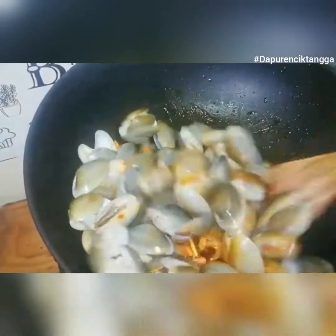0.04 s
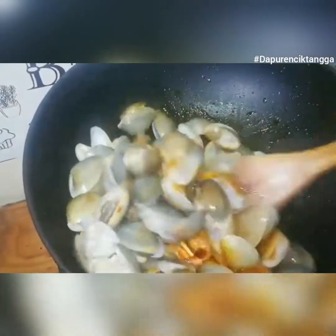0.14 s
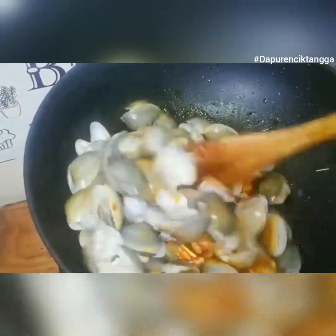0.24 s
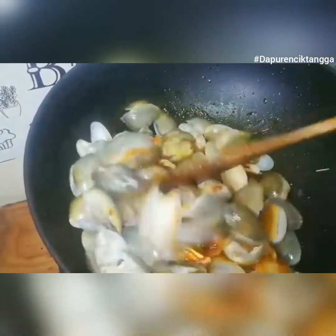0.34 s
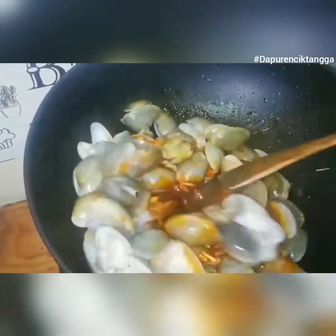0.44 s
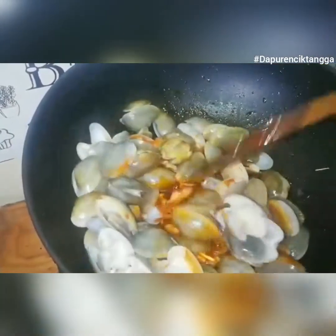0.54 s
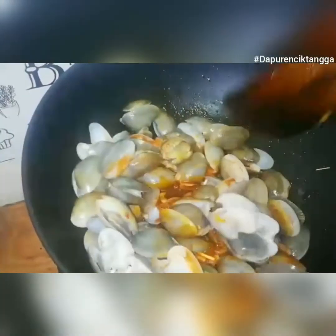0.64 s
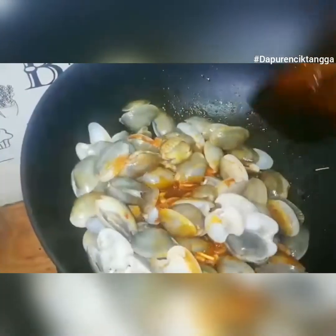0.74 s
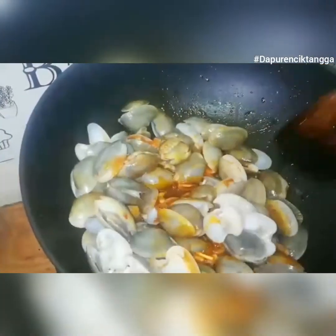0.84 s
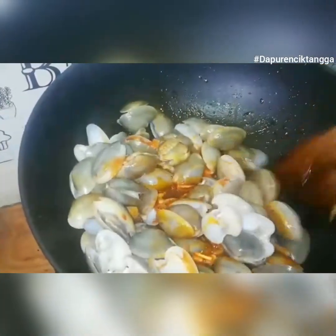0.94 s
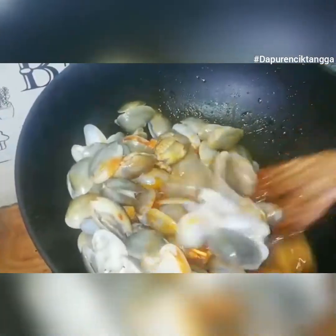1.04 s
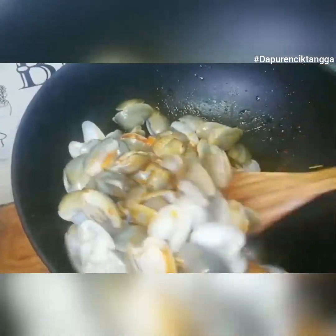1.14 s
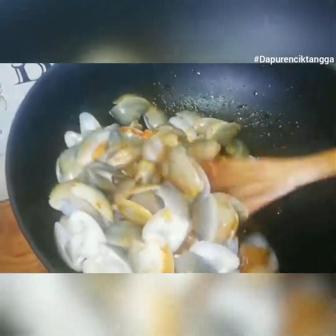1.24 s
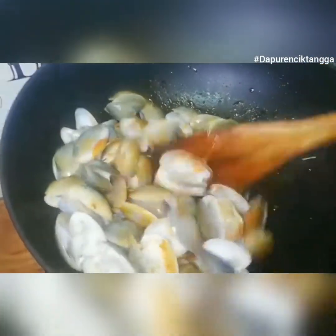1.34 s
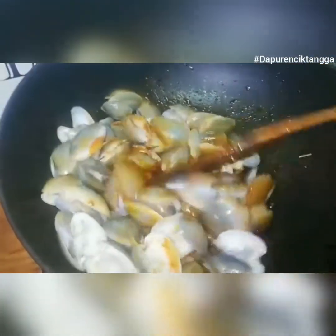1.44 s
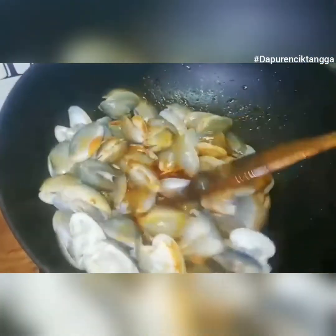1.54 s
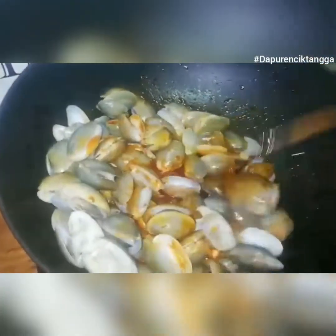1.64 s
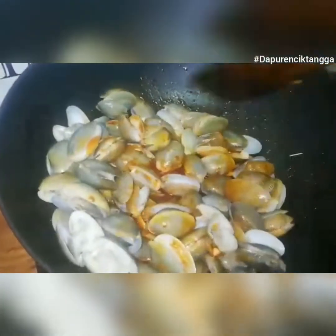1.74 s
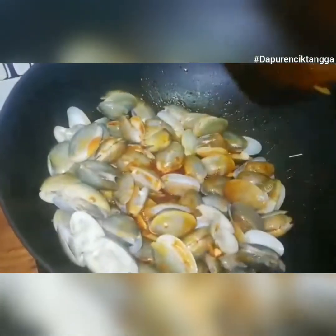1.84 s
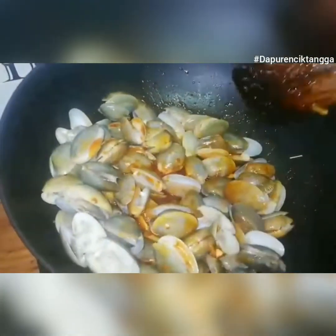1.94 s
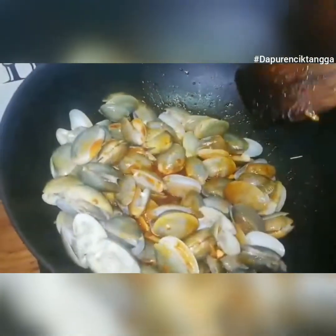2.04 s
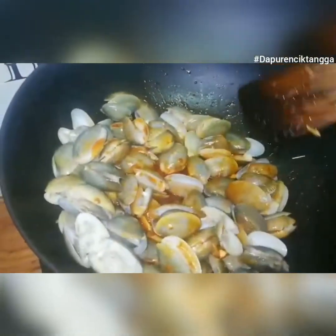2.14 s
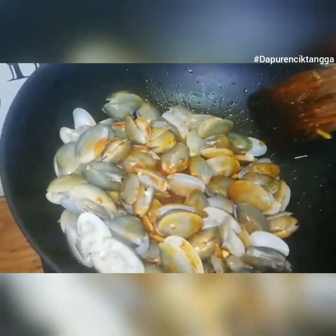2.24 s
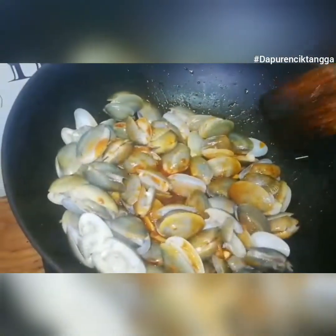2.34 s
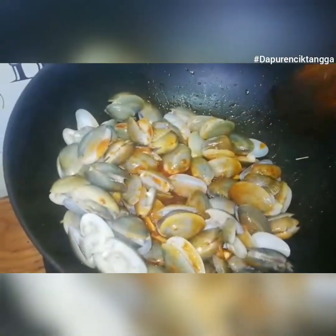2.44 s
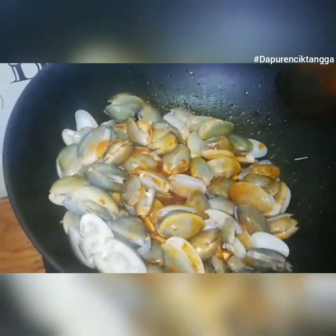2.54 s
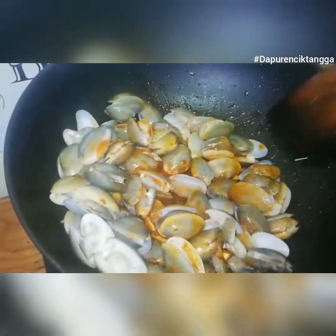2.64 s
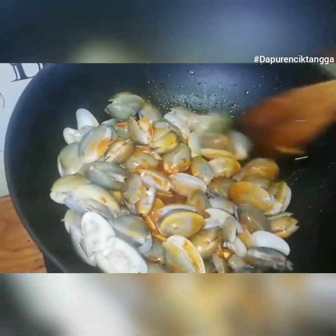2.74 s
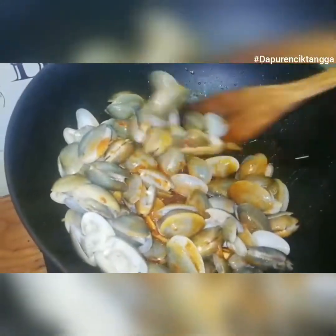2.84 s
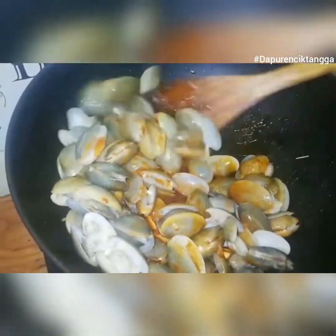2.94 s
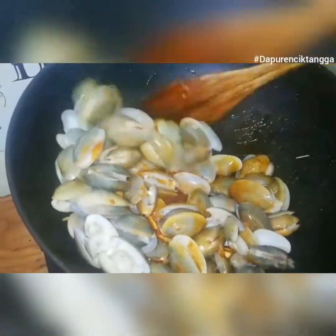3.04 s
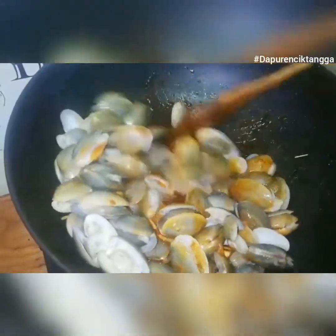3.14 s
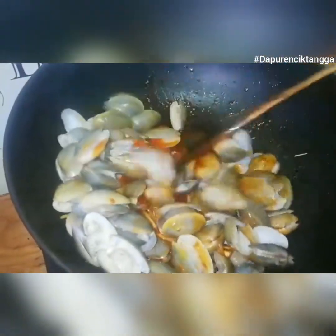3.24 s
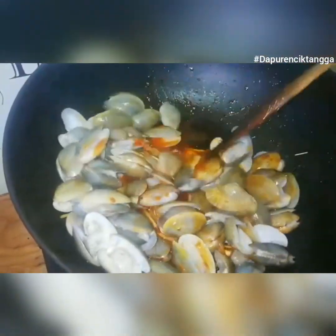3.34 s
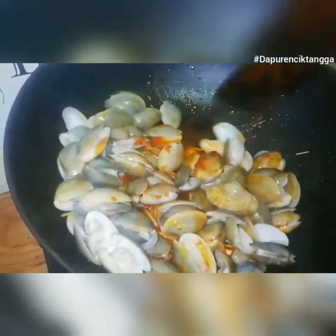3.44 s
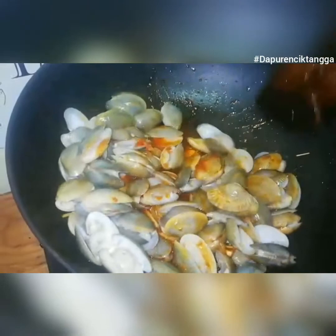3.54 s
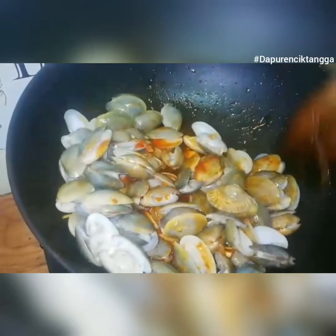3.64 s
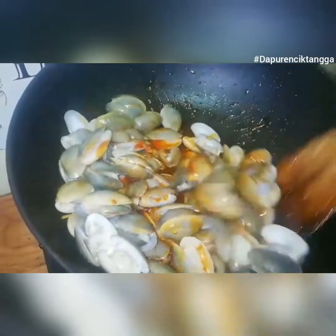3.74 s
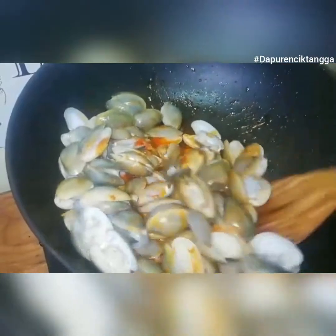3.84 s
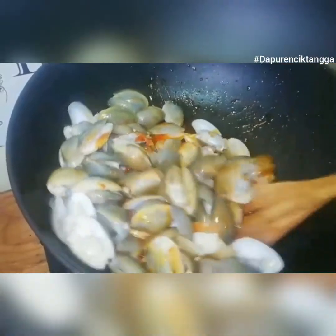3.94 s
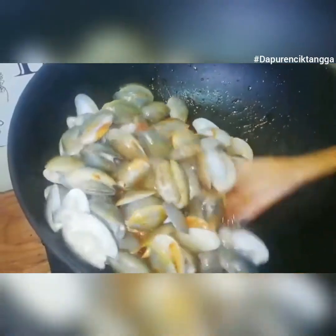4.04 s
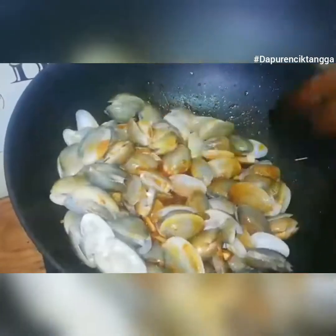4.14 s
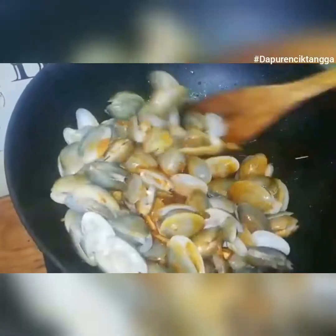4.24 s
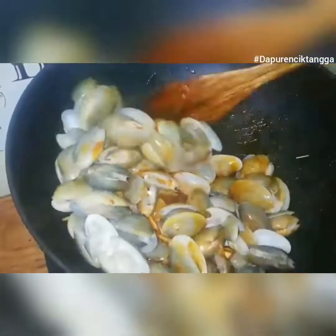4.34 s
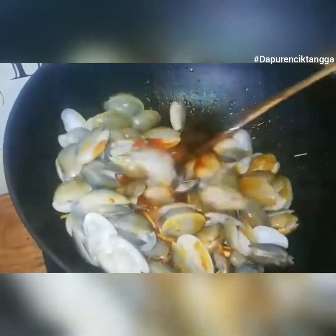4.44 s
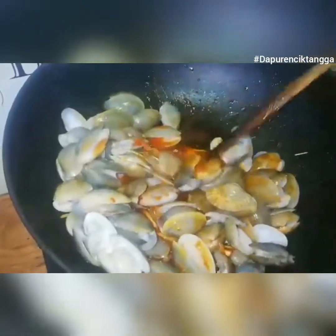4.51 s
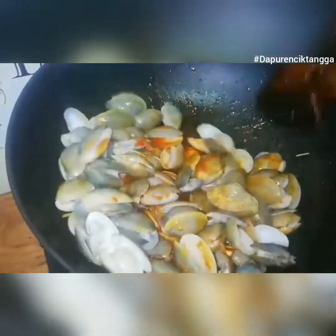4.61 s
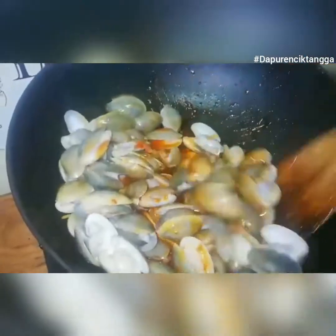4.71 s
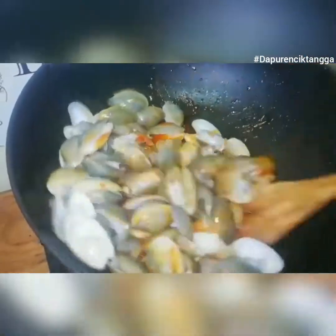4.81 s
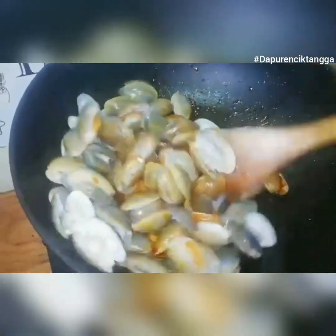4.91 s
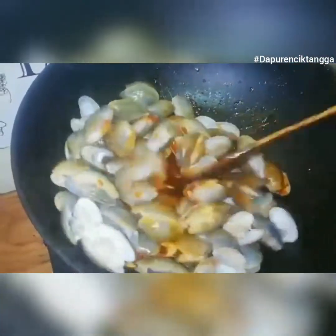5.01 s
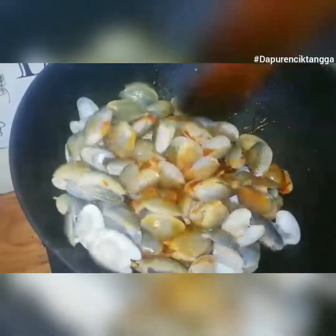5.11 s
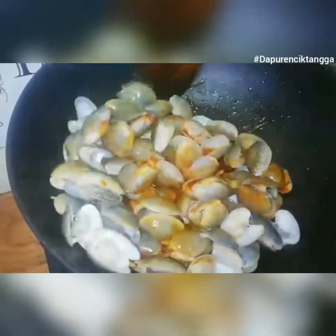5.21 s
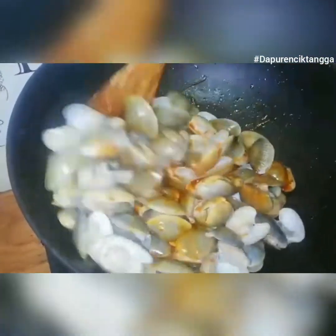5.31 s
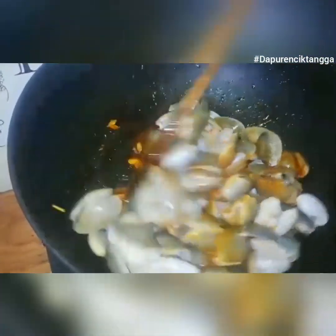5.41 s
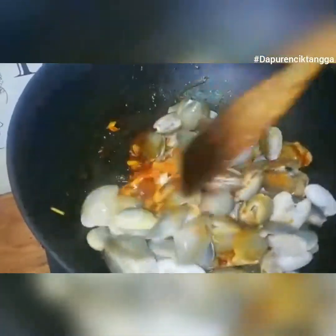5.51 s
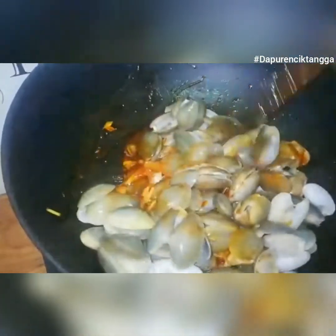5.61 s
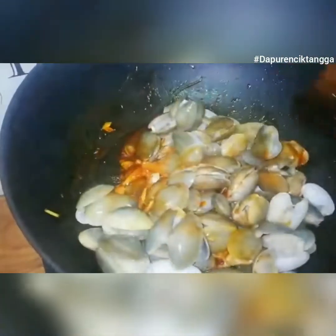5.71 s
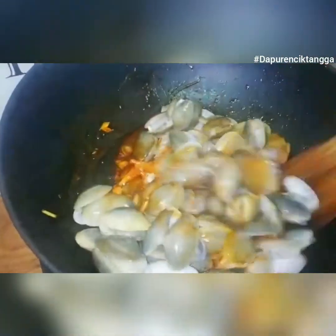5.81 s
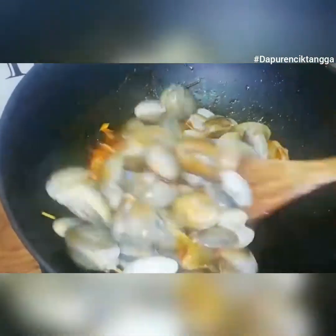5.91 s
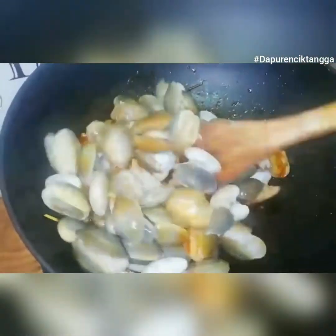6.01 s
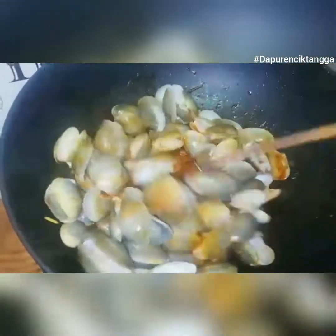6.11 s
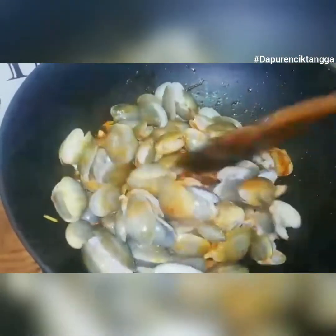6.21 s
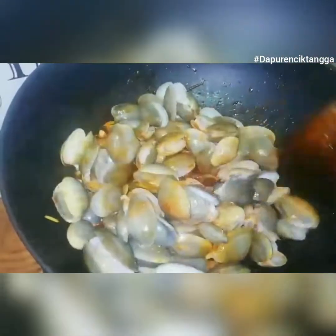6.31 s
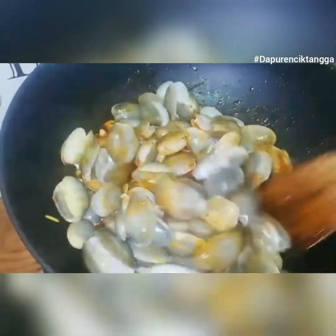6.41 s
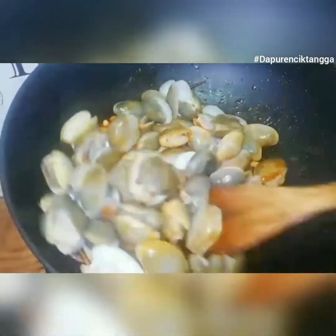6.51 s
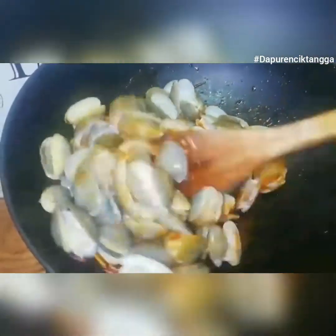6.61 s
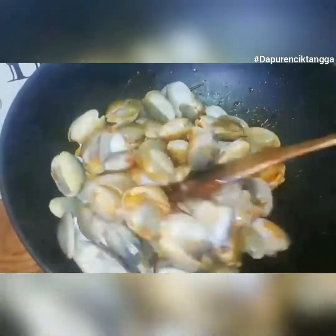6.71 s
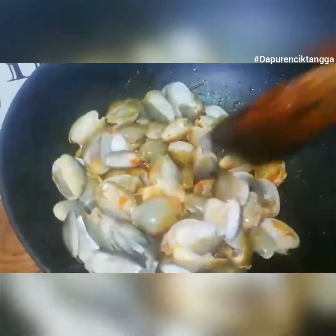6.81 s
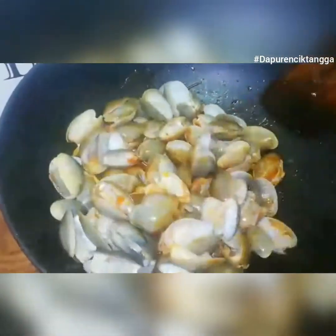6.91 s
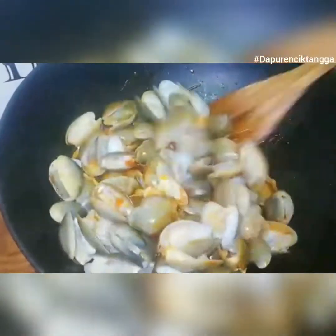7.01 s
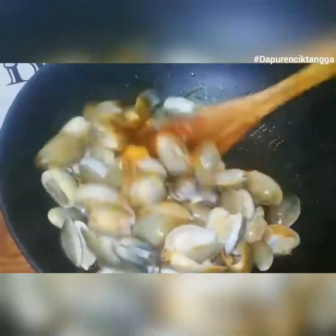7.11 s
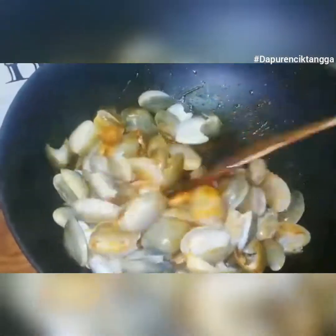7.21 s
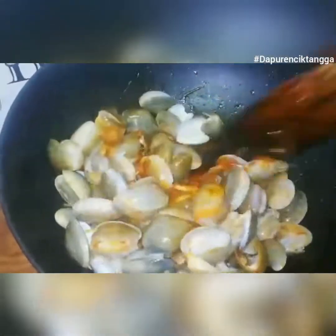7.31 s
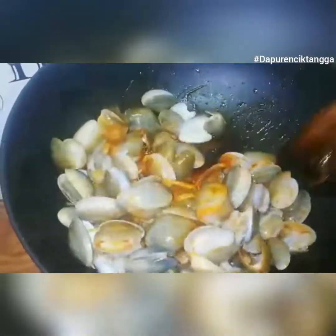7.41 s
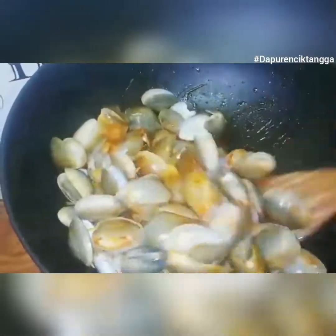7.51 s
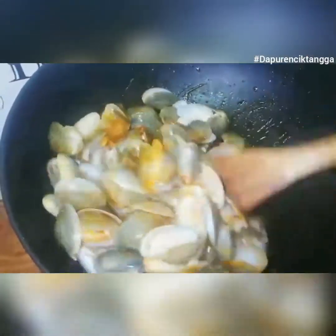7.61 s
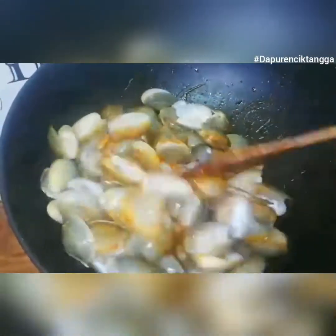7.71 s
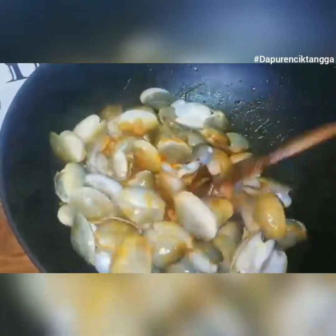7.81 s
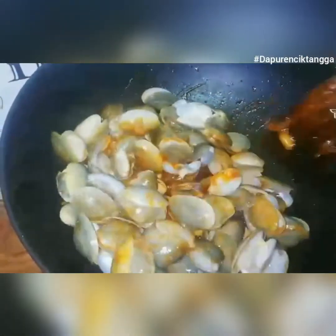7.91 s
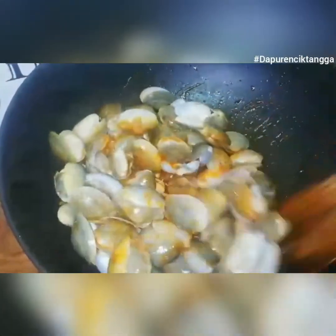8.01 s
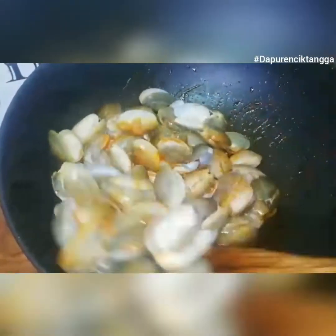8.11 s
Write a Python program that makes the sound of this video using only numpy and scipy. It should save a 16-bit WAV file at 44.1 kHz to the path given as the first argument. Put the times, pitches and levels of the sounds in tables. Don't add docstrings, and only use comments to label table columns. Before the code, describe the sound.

A wooden spatula stirs a heap of wet clam shells in a steel wok, very close in stereo. Each stroke begins with a woody knock and short metallic hum, then a dense bright rattle of ticks, clacks and hollow clonks with slight scraping. A pause near two seconds leaves faint ticks and a low air puff, then strokes return steadily. Small room echo and soft hiss.

```python
import sys
import numpy as np
from scipy import signal
from scipy.fft import rfft, irfft, next_fast_len
from scipy.io import wavfile
from scipy.ndimage import uniform_filter1d

SR = 44100
rng = np.random.default_rng(int(sys.argv[2]) if len(sys.argv) > 2 else 0)


def master_out(mix):
    frames = np.transpose(np.atleast_2d(mix))
    ceiling = np.clip(frames, -1, 1)
    pcm = np.round(ceiling * 32767).astype(np.int16)
    wavfile.write(sys.argv[1], SR, pcm)


def volts(x):
    e = np.asarray(x, float) / 20
    return 10 ** e


N = 359410

# t/s, knock peak/dB, knock f/Hz, hum level/dB, hum length/s
KNOCKS = [(0.35, -30, 1460, -51.5, 0.08), (0.893, -18, 1560, -33.5, 0.072), (2.563, -21.5, 1720, -42, 0.19),
          (2.878, -23, 1780, -40.5, 0.032), (3.606, -16.5, 1090, -35, 0.1), (4.154, -27, 730, -44.5, 0.089),
          (4.67, -20, 2000, -35, 0.036), (5.236, -24, 2370, -42, 0.013), (5.306, -16, 1483, -39.5, 0.017),
          (5.742, -19.5, 1670, -34.5, 0.015), (5.806, -32, 840, -42.5, 0.11),
          (6.969, -18.5, 2682, -35, 0.07), (7.44, -22, 2050, -35.5, 0.025),
          (7.744, -24.5, 1520, -57, 0.023), (8.015, -30, 2230, -59, 0.058)]
# f/Hz, level/dB, t60/s
HUM_MODES = [(216.5, -6.5, 0.4), (303.6, -0.5, 0.27), (388, -6.5, 0.074), (432.3, -6.5, 0.1)]
# f/Hz, density/dB per Hz
SHELL_COLOUR = [(290, -42), (500, -19.5), (710, -19), (798, -14.5), (1500, -2.5), (2390, -5.5),
                (3250, -1.5), (5920, -4), (9050, -0.5), (10500, -5), (15300, -20), (16500, -21)]


def evened(x):
    return x / np.sqrt(np.mean(x ** 2) + 1e-20)


def peaked(x):
    return x / (abs(x.mean(0)).max() + 1e-12)


def read(points, hz):
    f, value = np.transpose(points)
    return np.interp(np.log(hz + 1), np.log(f + 1), value)


def add(mix, start_s, sound):
    part = mix[:, round(start_s * SR):][:, :sound.shape[1]]
    part += sound[:, :part.shape[1]]


def coloured(x, points):
    size = next_fast_len(x.shape[-1])
    gain = volts(read(points, np.fft.rfftfreq(size, 1 / SR)))
    return irfft(rfft(x, size) * gain, size)[..., :x.shape[-1]]


def lumps(count, width):
    return evened(uniform_filter1d(rng.standard_normal(count), width))


def flat_bump(t, centre_s, half_s):
    return np.exp(-((t - centre_s) / half_s) ** 4)


def rings(hz, db, t60, rise_s, size):
    t = np.arange(size) / SR
    hz, db, t60 = (np.reshape(v, (-1, 1)) for v in (hz, db, t60))
    count = len(hz)
    shared_turn, own_turn = rng.random((count, 1)), rng.random((2, count, 1))
    face_db = rng.standard_normal((2, count, 1))
    apart = np.clip(0.14 + hz / 2800, 0, 1)
    decay = volts(db + 4.47 * apart * face_db - 60 * t / t60)
    modes = decay * np.sin(2 * np.pi * (hz * t + shared_turn + apart * own_turn))
    return modes.sum(1) * (1 - np.exp(-t / rise_s))


def choked_t60(hz, cycles):
    return cycles / np.sqrt(hz * 3000)


def shell(lo_hz, hi_hz, cycles, count):
    place, luck = rng.random((2, count))
    hz = lo_hz + (hi_hz - lo_hz) * place
    return rings(hz, -9 * luck, choked_t60(hz, cycles * (1.09 + 1.1 * luck)), 0.0001, size=400)


def tumble(x, rise_s, fall_s, share, blow=2.8):
    t = np.arange(500) / SR
    run = np.where(t < rise_s, (t / rise_s) ** 2, np.exp((rise_s - t) / fall_s))
    blows = run * rng.standard_normal(500) * (rng.random(500) < share)
    blows[round(rise_s * SR)] = blow
    return peaked(signal.fftconvolve(x, blows[None], axes=1))


def heap(lo_hz, hi_hz, cycles, count):
    return [tumble(shell(lo_hz, hi_hz, cycles, count=12), .0032, 0.0044, .09, blow=1.85) for _ in range(count)]


def strike(bodies, level_db, busy, per_s, spread_db):
    clump_db = np.clip(4 + 0.14 * (level_db - level_db.max() + 8), 1, 6)
    clump = volts(clump_db * lumps(N, 600))
    at = np.flatnonzero(rng.random(N) < per_s * busy * clump / SR)
    size = volts(spread_db * np.minimum(rng.exponential(1, N), 2.4)[at])
    size *= np.sqrt(SR / (per_s * busy[at]) / np.mean(size ** 2)) * volts(level_db[at])
    which = rng.integers(0, len(bodies), N)[at]
    out = np.zeros((2, N))
    for place, gain, k in zip(at, size, which):
        add(out, place / SR, gain / np.linalg.norm(bodies[k][0]) * bodies[k])
    return out


def rattle():
    level_db, hollow_db, drag_db = stirring()
    busy, steady = np.clip(volts(0.27 * (level_db + 27)), .3, 1.5), np.ones(N)
    hum_hz, hum_db, _ = np.transpose(HUM_MODES)
    bowl = []
    for _ in range(12):
        detuned_hz = hum_hz * rng.uniform(.95, 1.05, len(hum_hz))
        bowl.append(rings(detuned_hz, .3 * hum_db, .09, .004, size=2000))
    shells = heap(2030, 15870, 5.2, count=200)
    shuffle = strike(shells, level_db - 3.5, steady, 1500, 1.39)
    sharp = strike(shells, level_db + 14 * np.log10(busy), busy, 330, 1.03)
    hollow = strike(heap(473, 2430, 12.8, count=80), hollow_db - 1.5, steady, 400, 2.1)
    drag = strike(bowl, drag_db, steady, 70, 2.1)
    return volts(1.36) * coloured(shuffle + sharp, SHELL_COLOUR) + volts(4.0) * coloured(hollow, SHELL_COLOUR) + drag


def stirring():
    # t/s, length/s, rattle level/dB, settling/s per 20 dB, hollow part relative/dB
    strokes = [(0, 0.52, -31.5, 0.09, -5), (0.907, 0.0043, -41, -2.5, 3.5), (0.973, 0.73, -34.5, 0.21, -6),
               (2.563, 0.25, -51.5, .2, 4), (2.719, 0.035, -45, -1.6, 5), (2.757, .64, -38, 0.4, -5.5),
               (3.591, 0.013, -38.5, 0.2, 2.5), (3.73, .4, -28.5, -0.16, -5), (4.229, 0.35, -37, 0, -5.5),
               (4.663, 0.0042, -37, 0.14, -5), (4.73, 0.37, -35.5, 0.07, -3), (5.255, .02, -44, 0.7, -10),
               (5.275, 0.38, -36, -0.02, -6), (5.755, .01, -51.5, 0.3, -8), (5.817, 0.91, -35, 0.22, -3),
               (6.968, .005, -37, 0.7, -3), (7.019, 0.21, -29, 0.11, -8), (7.46, 0.019, -49, 0.9, 11),
               (7.498, 0.4, -35.5, 0.02, -4.5), (8.032, 0.19, -31.5, .1, -4.5)]
    # t/s, extra level/dB, build-up/s, dying/s
    spills = [(0, 10, .1, 0.21), (0.42, 10.5, 0.22, 0.071), (.632, 23, 0.017, 0.18),
              (1.088, 9.5, 0.2, 0.19), (1.18, 4.5, .06, 0.047), (1.427, 12, 0.16, 0.15),
              (1.611, 10.5, 0.081, 0.077), (1.738, 12.5, 0.017, 0.08), (1.8, 6, 0.05, 0.11),
              (2.799, 14, 0.075, 0.16), (2.942, 15, 0.12, 0.066), (3.214, 17, 0.2, 0.19),
              (4.302, 16, 0.082, 0.1), (4.48, 11.5, 0.089, 0.086), (4.646, 14, .004, 0.0057),
              (4.76, 7.5, 0.061, 0.089), (4.848, 8.5, 0.082, 0.02), (5.039, 12, 0.19, 0.031),
              (5.135, 9, 0.029, 0.023), (5.31, 11, 0.065, 0.054), (5.363, 7, 0.081, 0.48),
              (5.853, 15.5, 0.016, 0.098), (6.111, 10.5, 0.032, 0.091), (6.331, -11, 0.063, 0.024),
              (6.445, 12.5, 0.071, 0.085), (6.68, 7, 0.13, 0.034), (7.099, 4, 0.15, 0.35),
              (7.535, 12.5, 0.06, 0.15), (7.775, 6.5, 0.12, 0.074), (8.057, 6.5, 0.036, 0.064)]
    # t/s, extra drag/dB, half length/s
    leans = [
        (0.387, 7, 0.033),
        (1.84, -3, 0.099),
        (5.01, 2, 0.2),
        (5.547, -9, 0.26),
        (6.54, 10, 0.057),
        (8.01, 13.5, 0.033),
    ]
    attack_s = 0.016
    rest_db, rest_hollow_db = -59.5, -63
    hollow_share = 0.79
    hollow_fade_db, hollow_settle = -2.5, 0.82
    drag_db, drag_share = -58, 0.49
    scrape_db, scrape_s = -14.5, .12

    t = np.arange(0, N, 32) / SR
    spill_db = 0
    for s, db, rise_s, fall_s in spills:
        spill_db = spill_db + db * np.clip(np.minimum(1 + (t - s) / rise_s, 1 - (t - s) / fall_s), 0, 1)
    level, hollow = volts(rest_db) ** 2, volts(rest_hollow_db) ** 2
    for s, length_s, db, settle_s, hollow_db in strokes:
        rise_db = -20 * np.maximum((s - t) / attack_s, 0)
        fall_db = -20 * np.maximum((t - s - length_s) / max(settle_s, .01), 0)
        dig_db = hollow_db + hollow_fade_db * (np.clip((t - s) / length_s, 0, 1) - .5)
        level = level + volts(db + rise_db + fall_db + spill_db) ** 2
        hollow_fall_db = fall_db / hollow_settle
        hollow = hollow + volts(db + rise_db + hollow_fall_db + dig_db + hollow_share * spill_db) ** 2
    level_db = 10 * np.log10(level)
    lean_db = sum(db * flat_bump(t, s, half_s) for s, db, half_s in leans)
    drag = volts(drag_db + lean_db + drag_share * (level_db + 29.0)) ** 2
    for s, _, _, hum_db, length_s in KNOCKS:
        fall_db = -20 * np.maximum((t - s - length_s) / scrape_s, 0)
        drag = drag + (t > s) * volts(hum_db + scrape_db + fall_db) ** 2
    return [np.interp(np.arange(N) / SR, t, 10 * np.log10(power)) for power in (level, hollow, drag)]


def clacks():
    # t/s, peak/dB, strongest ring f/Hz
    edge_ticks = [(.1462, -3, 10200), (.494, -7.5, 10700), (.5756, -8, 8500), (1.0042, -12, 8840),
                  (1.0166, -1, 10450), (1.0265, -6.5, 10400), (1.116, -4.5, 9870), (1.253, -7.5, 9800),
                  (1.59, -8, 9800), (1.6788, -9, 7360), (2.9497, -4.5, 8640), (2.984, -2, 9000),
                  (3.3048, -10, 10440), (3.7983, -5.5, 9200), (3.8623, -2, 8830), (3.993, -12, 9400),
                  (4.0446, -8, 8800), (4.424, -11.5, 10000), (4.792, -5.5, 8650), (4.8895, -7.5, 8800),
                  (5.051, -15, 8900), (5.9582, -6, 9300), (6.0307, -10, 8000), (6.073, -2, 7900),
                  (6.3044, -8.5, 8400), (6.79, -16, 7800), (7.185, -4, 9700), (7.835, -18, 7000),
                  (7.907, -21, 8300), (8.0415, -21, 9600)]
    # t/s, peak/dB, strongest ring f/Hz
    back_clacks = [(.1094, -3.5, 4550), (.2389, -9.5, 4600), (.2809, -8.5, 5040), (1.055, 0, 5460),
                   (1.6603, -12.5, 3500), (1.721, 0, 6520), (2.8218, -4, 6630), (2.9006, -9, 3280),
                   (3.035, -12, 5650), (3.3462, -13.5, 3760), (3.4313, -13, 2670), (3.495, -20.5, 6650),
                   (3.594, -16, 7100), (3.93, -10, 4100), (4.1372, -8.5, 3130), (4.4622, -8.5, 6700),
                   (4.581, -13, 2390), (4.6132, -22, 6460), (4.866, -12.5, 6580), (4.933, -13, 3000),
                   (5.4655, -17, 3420), (5.671, -11, 4850), (5.8352, -6.5, 6700), (6.468, -7.5, 3010),
                   (6.7438, -7.5, 4300), (6.839, -13, 3040), (7.2796, -11, 4700), (7.4874, -12, 6030),
                   (7.86, -13.5, 6000), (8.0637, -8, 3160), (.6245, -21, 3435), (3.5495, -25, 5560),
                   (5.137, -23, 7500), (6.217, -22.5, 8500), (6.735, -20, 2780), (.3135, -6.5, 7600),
                   (3.3525, -14, 7100), (4.646, -22.5, 7000)]
    # t/s, peak/dB, strongest ring f/Hz
    cup_clonks = [(.0538, -3.5, 4690), (.3581, -4.5, 5200), (.4199, -11.5, 3560), (.9738, -8, 7270),
                  (1.322, -14.5, 6750), (1.5135, -7.5, 3560), (2.5648, -27, 2540), (2.764, -17, 3550),
                  (2.798, -7, 10400), (3.1096, -12, 10000), (3.1951, -8.5, 4770), (3.7224, -12.5, 2280),
                  (4.2527, -15.5, 8600), (4.2744, -11, 7100), (4.4504, -8, 7800), (4.7237, -15.5, 2240),
                  (5.235, -22.5, 3030), (5.297, -15.5, 9200), (5.3083, -10, 8300), (5.8939, -3, 3320),
                  (6.0975, -9.5, 5900), (6.4326, -14, 9200), (6.6493, -12.5, 8600), (6.6705, -16.5, 5260),
                  (6.9688, -12.5, 2650), (7.0231, -8.5, 5500), (7.0692, -13.5, 6040), (7.6932, -17, 8950),
                  (7.7667, -12.5, 8600), (3.5725, -24.5, 2850), (5.1185, -17, 1670), (6.339, -16.5, 3250)]
    out = np.zeros((2, N))
    for rows, hollow_db in (edge_ticks, -23), (back_clacks, -32.5), (cup_clonks, -10):
        for s, db, hz in rows:
            lead_hz = hz * np.array([.9, 1, 1.12])
            lead = rings(lead_hz, [-3, 0, -3], 12 / np.sqrt(hz * 3000), 0.00072, size=400)
            near = shell(0.698 * hz, 1.316 * hz, 6.2, count=10)
            crack = coloured(shell(max(2130, 0.543 * hz), 14480, 20.6, count=40), SHELL_COLOUR)
            body = 0.69 * peaked(lead) + 0.32 * peaked(near) + 0.98 * peaked(crack)
            bright = tumble(body, 0.0034, 0.0019, 0.22, blow=1.73)
            hollow = tumble(shell(1013, 2370, 20.4, count=6), 0.0021, 0.0023, 0.066)
            add(out, s - .0018, volts(db - 3.5) * (bright + volts(hollow_db) * hollow))
    return out


def spatula():
    # f/Hz, level/dB, t60/s
    wok_modes = [(553.5, -10, 0.18), (765.5, -6, 0.16), (992, -10, 0.19), (1203, -8, 0.24),
                 (1512, -1, 0.089), (1920, -10.5, 0.15), (2130, -3.5, 0.15), (2650, -4, 0.1)]
    sag_share, sag_s = 0.29, 0.012
    wood_ratios = np.array([.45, .6, .8, 1, 1.3, 1.7, 2.3, 3.7])
    wood_db = [-2.0, 0, -5.0, 10.5, -2.0, -2, -7.0, -23.0]

    size = 9000
    out, t = np.zeros((2, N)), np.arange(size) / SR
    wok_hz, wok_db, wok_t60 = np.transpose(wok_modes)
    rock_hz, _, rock_t60 = HUM_MODES[0]
    for s, db, hz, hum_db, length_s in KNOCKS:
        damp = 1 / (1 + np.exp((t - length_s) / 0.0053)) + 0.019
        wood = rings(hz * wood_ratios, wood_db, 0.011, 0.00067, size=900)
        spot_db = 0.9 * rng.standard_normal(len(wok_hz))
        steel = peaked(rings(wok_hz, wok_db + spot_db, wok_t60, 0.0029, size=size))
        thump = sum(rings(*mode, 0.0035, size=size) for mode in HUM_MODES[1:])
        turns = np.cumsum(rock_hz * (1 + sag_share * np.exp(-t / sag_s))) / SR
        swell = np.sin(2 * np.pi * turns + [[0], [.35]])
        swell *= volts(-60 * t / rock_t60) * (1 - np.exp(-(t / 0.015) ** 2))
        swell *= volts(3 * lumps(size, 700))
        crack = peaked(shell(486, 6130, 74, count=40))
        jump = np.pad(tumble(crack, .001, .004, .1), ((0, 0), (0, 500)))
        add(out, s, volts(db - 4.5) * tumble(wood, 0.00096, 0.0045, .08) + volts(db - 9) * jump)
        steel_gain = volts(db - 14.0 + 6.5 * lumps(size, 150))
        hum = volts(hum_db + 5.0) * peaked(thump + 1.5 * swell)
        add(out, s, (steel_gain * steel + hum) * damp)
    return out


def contacts():
    # t/s, peak/dB, ring f/Hz
    cups = [(0.1218, -19.5, 1660), (0.3989, -22, 1090), (0.4762, -20, 2390), (0.485, -25, 3220),
            (1.0313, -16, 1910), (1.1186, -17, 3500), (1.1707, -38, 3440), (1.1971, -25, 3300),
            (1.2163, -23, 3680), (1.2737, -21, 3120), (1.4776, -21.5, 1436), (.0165, -19.5, 1630),
            (1.6905, -18, 2280), (1.7859, -33.5, 3320), (2.7664, -24, 1850), (2.8043, -18, 3970),
            (2.8261, -18, 3270), (3.1685, -21.5, 2130), (3.2635, -26, 1800), (3.2794, -25, 1700),
            (5.3085, -25.5, 1365), (3.8628, -20.0, 3440), (3.895, -22.5, 3180), (3.9188, -19, 3300),
            (3.9442, -27, 3600), (3.9676, -28, 1890), (3.9778, -23, 3950), (5.2375, -27, 2550),
            (4.2757, -22, 3470), (4.3424, -26, 2190), (4.4531, -21, 2140), (4.4902, -22, 2060),
            (4.5397, -23.5, 3550), (7.6935, -29, 1310), (4.737, -29, 1980), (4.7478, -22, 3480),
            (4.8288, -22.5, 1700), (4.9145, -22, 1860), (5.1975, -47, 1590), (5.615, -28, 1680),
            (5.6345, -34, 3300), (5.6989, -33.5, 1730), (5.8338, -25.5, 2350), (5.9637, -22.5, 3100),
            (6.0116, -24, 3050), (6.1005, -19.5, 1560), (6.2424, -33.5, 1700), (5.2385, -31.5, 1400),
            (6.4238, -24, 3780), (6.4342, -28, 1790), (6.5628, -27.5, 1750), (6.5766, -28, 2990),
            (6.6077, -25.5, 3700), (7.0494, -19.9, 4080), (7.1184, -21.5, 3400), (7.5238, -26, 1680),
            (7.6429, -31, 2520), (7.7454, -21, 1500), (8.0837, -17, 3320)]
    # t/s, peak/dB, ring f/Hz
    rims = [(0.1274, -13.5, 4860), (0.1902, -31, 8100), (0.2553, -22, 4550), (0.2628, -13.5, 8570),
            (0.3846, -20, 8110), (0.4209, -18.5, 7500), (0.4279, -16, 7660), (1.1027, -17, 8740),
            (1.1649, -20, 7590), (1.2025, -18, 6370), (1.3898, -20.5, 9450), (1.4093, -17, 8500),
            (1.4508, -12, 8460), (1.5531, -20.5, 6100), (1.6247, -20.5, 6160), (1.6311, -24, 10200),
            (2.8354, -20.5, 6860), (2.9032, -23, 9470), (2.966, -10, 8960), (3.0512, -20, 5460),
            (3.0776, -19, 6790), (3.7417, -18, 4410), (.0298, -19, 6370), (4.0766, -22, 8960),
            (4.1073, -20, 7760), (4.285, -18, 7280), (4.351, -12, 10340), (4.3717, -19.5, 4880),
            (4.4118, -28, 4830), (4.476, -15.8, 8760), (4.5274, -15.5, 9090), (4.9363, -20, 8600),
            (5.0313, -17, 7950), (5.0583, -17, 8710), (5.276, -22, 5980), (5.3902, -18, 8200),
            (5.4764, -23, 8800), (5.5549, -19.5, 7200), (6.0456, -14.5, 7990), (6.1345, -23, 10230),
            (6.1755, -16.5, 8040), (6.2719, -19, 5660), (6.2998, -30.5, 11550), (6.4868, -19, 9240),
            (6.5834, -24.5, 9380), (6.6311, -24, 6580), (7.7915, -21, 8660), (6.7351, -24.5, 8890),
            (6.9703, -18.5, 9040), (7.0345, -22, 5130), (7.0723, -17, 5920), (7.0896, -17, 9300),
            (7.1576, -17, 9980), (7.2642, -21, 8560), (7.2905, -19, 8780), (7.6057, -19, 8490),
            (7.7245, -26, 9780), (8.1375, -20, 8980), (8.0635, -12.5, 8900)]
    # t/s, peak/dB, ring f/Hz, t60/s
    grunts = [(0.016, -28, 987, 0.065), (.325, -38, 890, 0.11), (.352, -37, 396, 0.34),
              (0.391, -38, 1050, .07), (.41, -39, 435, 0.15), (4.676, -36, 2650, .1),
              (5.2355, -20.5, 2557, 0.023), (2.8, -33, 960, 0.034), (2.98, -36.5, 856, 0.033),
              (4.086, -39.5, 390, 0.15), (5.2355, -26.5, 1430, 0.016), (4.99, -40, 377, .1),
              (6.484, -38, 935, .05), (6.558, -39.5, 775, 0.07), (3.614, -33.5, 2680, .2),
              (3.616, -34, 2150, .2), (5.3095, -23, 1350, 0.027)]
    out = np.zeros((2, N))
    for rows, cycles in (cups, 21), (rims, 12):
        for s, db, hz in rows:
            lead_hz = hz * np.array([.92, 1, 1.09])
            lead = rings(lead_hz, [-7, 0, -7], cycles / np.sqrt(hz * 3000), 0.00083, size=600)
            near = shell(max(1050, 0.562 * hz), 1.715 * hz, 1.24 * cycles, count=12)
            body = peaked(lead) + .45 * np.pad(peaked(near), ((0, 0), (0, 200)))
            add(out, s - .0036, volts(db + 2.5) * tumble(body, 0.0025, 0.0019, .09, blow=2.2))
    for s, db, hz, t60 in grunts:
        grunt = rings(hz * np.array([.93, 1, 1.1]), [-8, 0, -8], t60, 3.1 / hz, size=7000)
        add(out, s, volts(db) * peaked(grunt))
    return out


def settling():
    # t/s, peak/dB, ring f/Hz
    settling_ticks = [
        (1.9127, -40, 3420),
        (2.0978, -41, 2020),
        (2.159, -41, 1344),
        (2.339, -43, 1920),
        (2.3544, -40, 2030),
        (2.431, -43, 1910),
        (2.543, -35.5, 1840),
        (2.727, -26.5, 1230),
        (2.673, -37, 1950),
    ]
    out = np.zeros((2, N))
    for s, db, hz in settling_ticks:
        tick = rings(hz * np.array([.6, 1, 1.12, 1.5]), [-10, 2.5, -8, -11], 0.01, 0.001, size=900)
        add(out, s, volts(db - 4.5) * peaked(tick))
    return out


def echo(x):
    # f/Hz, t60/s
    tail_t60 = [(300, 0.34), (1500, 0.2), (5000, 0.16), (10000, 0.1), (15000, 0.071)]
    taps = np.zeros((2, SR // 2))
    grid = np.arange(60, SR // 2 - 20, 20)
    at = grid + rng.integers(0, 20, (2, len(grid)))
    np.put_along_axis(taps, at, rng.choice([-1., 1.], at.shape), 1)
    hz, t, z = signal.stft(taps, SR, nperseg=256)
    tail = signal.istft(z * volts(-60 * t / read(tail_t60, hz)[:, None]), SR, nperseg=256)[1]
    return signal.oaconvolve(x, tail / np.linalg.norm(tail[0]), axes=1)[:, :N]


def kitchen():
    # f/Hz, density/dB per Hz
    hiss_colour = [(88, -47), (150, -5.5), (356, -6.5), (378, -6), (518, -19), (571, -18), (798, -16),
                   (916, -16.5), (7810, -27.5), (15200, -36), (16500, -43)]
    a, b = rng.standard_normal((2, N))
    shared = coloured(a, [(150, 6.5), (500, -18.0), (1200, -8)])
    own = coloured(b, [(150, -23.0), (500, 3.5), (1200, 3.5)])
    other = coloured(b[::-1], [(150, -20.0), (500, 5.0), (1200, 4.0)])
    hiss = evened(coloured(np.array([shared + own, shared + other]), hiss_colour))
    whistle = signal.lfilter(*signal.iirpeak(5480, 90, SR), a)
    return volts(-55.5) * (hiss + volts(-23) * evened(whistle))


def air():
    # f/Hz, density/dB per Hz
    air_colour = [(9, -31.5), (20, 1.5), (40, -10), (63, -1), (85, -4), (140, -10.5), (200, -38),
                  (400, -84)]
    # t/s, extra level/dB, half length/s
    puffs = [
        (.95, 7, 0.079),
        (2.216, 20.5, 0.073),
        (2.363, 10, 0.04),
        (6.8, 2, 0.6),
    ]
    a, b = rng.standard_normal((2, N))
    rumble = evened(coloured(np.array([a + 0.037 * b, a - 0.0343 * b]), air_colour))
    t = np.arange(N) / SR
    puff_db = sum(db * flat_bump(t, s, half_s) for s, db, half_s in puffs)
    swell_db = evened(uniform_filter1d(b, 6000))
    return volts(-57.5 + puff_db + swell_db) * rumble


def scene():
    duck_from_db, duck_share, recover_db_per_s = -45, 0.18, 45
    wok = rattle() + clacks() + spatula() + settling() + contacts()
    power_db = 10 * np.log10(abs(uniform_filter1d((wok ** 2).mean(0), size=2000)) + 1e-12)
    fall_db = np.arange(N) * recover_db_per_s / SR
    held_db = np.maximum.accumulate(power_db + fall_db) - fall_db
    over_db = np.maximum(held_db - duck_from_db, 0)
    return wok + volts(-10.0) * echo(wok) + kitchen() * volts(-duck_share * over_db) + air()


def low_pass(x):
    return signal.sosfilt(signal.butter(12, 16630, fs=SR, output="sos"), x)


def record(dry):
    # t/s, level/dB
    dropouts = [
        (0.159, -2),
        (4.15, -29),
        (4.438, -9),
    ]
    dry = np.clip(dry, -.72, .72)
    left = coloured(dry[0], [(5000, 0.0), (9000, 0.5), (14000, -4.5), (15700, 9.0), (16500, -34)])
    right = coloured(dry[1], [(9000, -1.0), (11000, 2.5), (14000, 1.0), (15700, -1.5), (16500, -29.5)])
    t = np.arange(N) / SR
    duck_db = sum(db * flat_bump(t, s, 0.0035) for s, db in dropouts)
    return low_pass(np.clip(volts(duck_db) * np.array([left, right]), -1, 1))


dry = scene()
out = record(dry)
master_out(out)
```